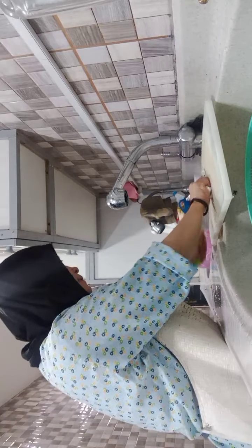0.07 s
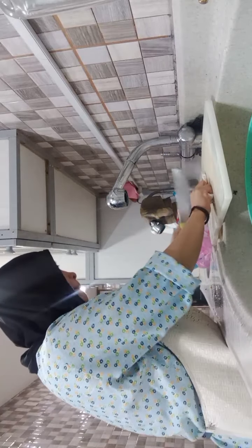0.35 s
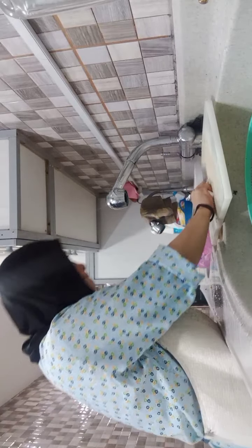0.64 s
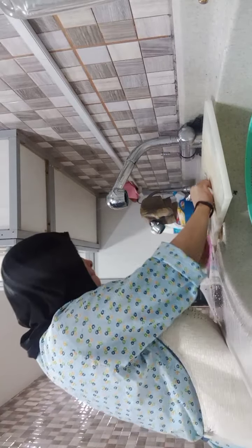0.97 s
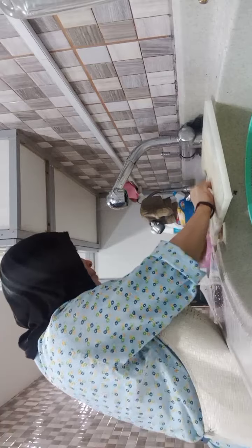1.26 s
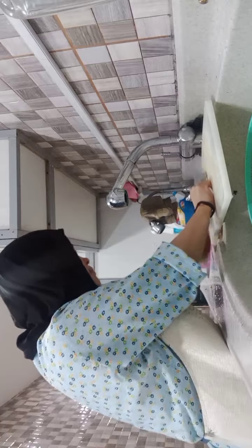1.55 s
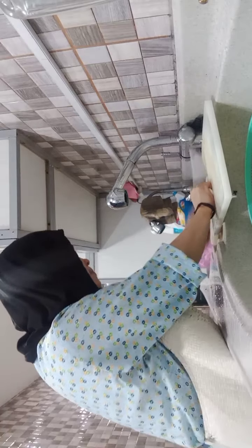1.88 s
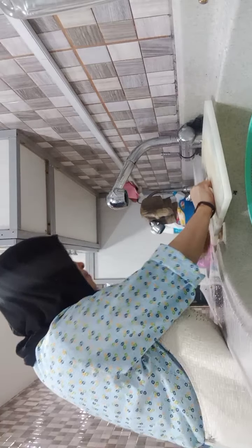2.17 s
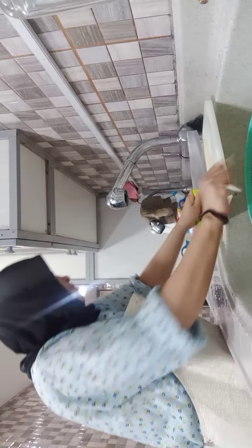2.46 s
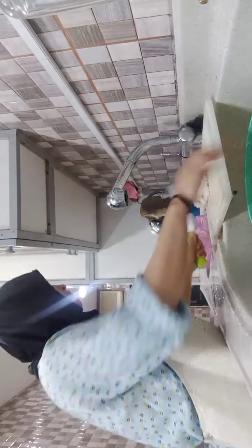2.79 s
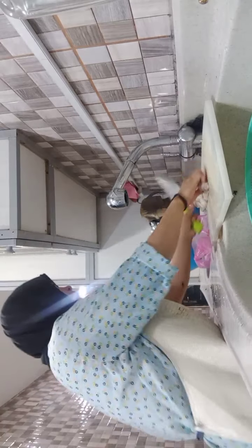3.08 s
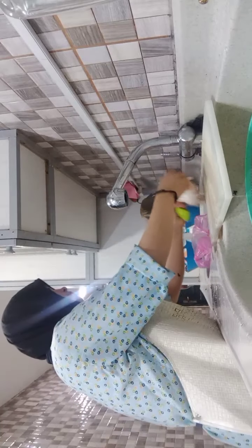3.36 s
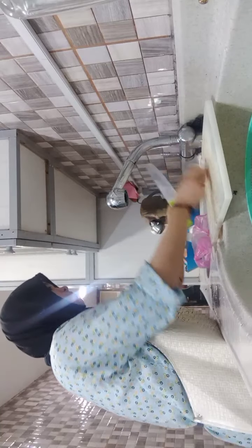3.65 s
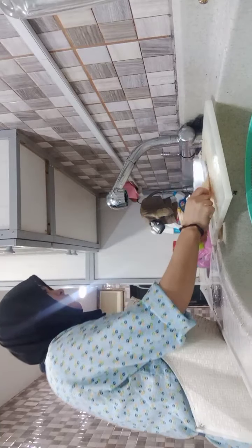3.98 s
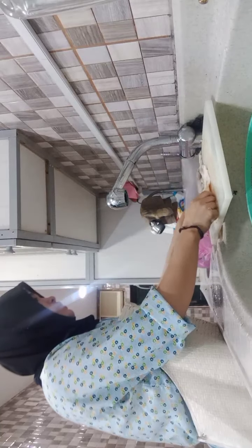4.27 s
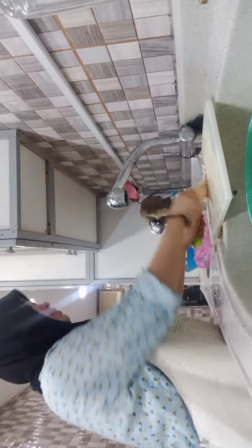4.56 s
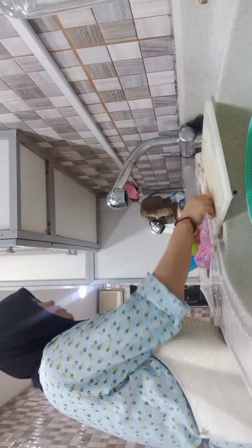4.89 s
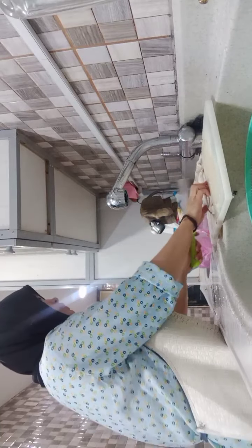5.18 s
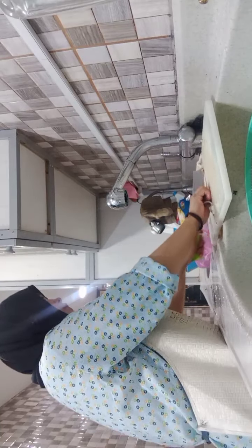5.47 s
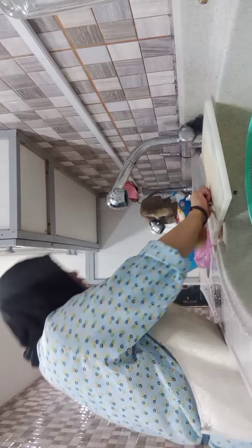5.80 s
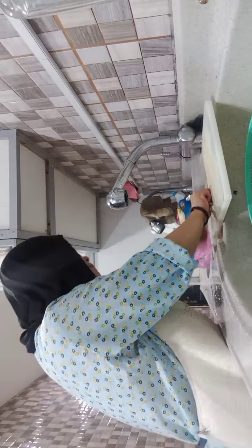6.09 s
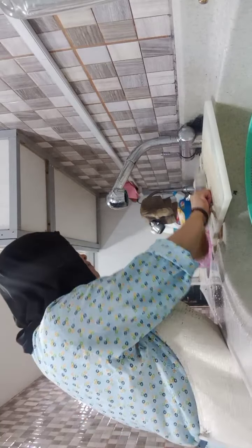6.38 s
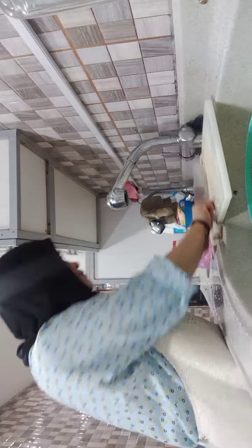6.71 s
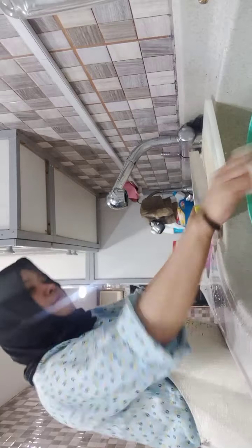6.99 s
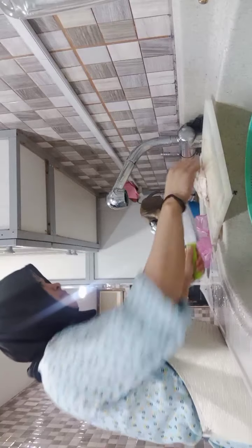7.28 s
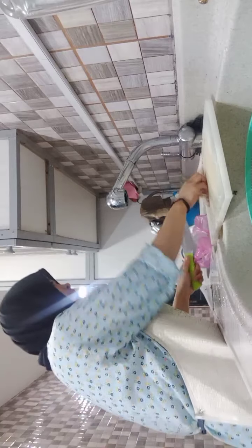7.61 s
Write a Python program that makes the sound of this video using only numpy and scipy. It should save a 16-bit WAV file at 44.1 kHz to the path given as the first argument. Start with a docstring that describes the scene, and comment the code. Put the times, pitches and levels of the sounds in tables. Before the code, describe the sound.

A wet sponge scrubs a cutting board over a sink in a small tiled kitchen. From about 0.5 to 2.3 seconds the strokes come quickly, with squelching suds, short judders of the board, dull nudges against the basin and light ticks and scrapes of a knife. The work then goes quieter, with a small clink near 2.7 seconds. At 3.6 seconds the blade strikes the board sharply, followed by a spit of foam at 4 and a hollow bump of the basin at 4.4. Scrubbing picks up again from 5.7 to 6.8 seconds, and at 6.1 the knife is put down with a loud, briefly ringing clack. A few soft knocks and a clink follow just after 7 seconds. Faintly behind it all are a thin, high pulsing whistle, a motor drone that comes and goes, electrical hum, low house noise and steady hiss.

```python
"""A wet sponge scrubs a cutting board and a knife over the sink of a small tiled kitchen.
Its slips shake the board and the basin; suds squelch and spit, and the board judders and bumps.
The knife clinks, scrapes, strikes the board and is once put down with a loud clack.
Behind it are a thin pulsing whistle, a motor's drone, mains hum, low house noise and a steady hiss."""
import sys
import numpy as np
from scipy import signal
from scipy.fft import rfft, irfft, next_fast_len
from scipy.io import wavfile
from scipy.ndimage import map_coordinates

SR = 44100
rng = np.random.default_rng(int(sys.argv[2]) if len(sys.argv) > 2 else 0)


def store_wav(level_fs):
    """Save 16-bit WAV to argv[1]."""
    pcm = np.round(np.clip(np.atleast_2d(level_fs), -1, 1) * 32767)
    wavfile.write(sys.argv[1], SR, pcm.T.astype(np.int16))


N = 337365

# sponge strokes: t/s, length/s, rub level/dB, wet swish level/dB
SPONGE_STROKES = [(0.534, 0.07, -59, -57), (0.656, 0.076, -48.5, -60.5), (0.784, 0.11, -48, -66),
                  (0.922, 0.089, -45.5, -62), (1.123, 0.044, -46, -66), (1.225, 0.086, -39.5, -53),
                  (1.411, 0.08, -44, -60), (1.528, 0.11, -46, -71), (1.687, 0.08, -42.5, -59),
                  (1.828, 0.047, -40.5, -45.5), (1.98, 0.079, -40, -57.5), (2.142, 0.083, -41.5, -54.5),
                  (3.05, 0.19, -53, -70.5), (4.031, 0.08, -39.5, -44), (4.43, 0.044, -55.5, -53),
                  (5.285, 0.11, -53, -73), (5.756, 0.06, -45, -57.5), (5.875, 0.075, -45.5, -62),
                  (6.053, 0.083, -43, -51.5), (6.355, 0.055, -40, -51.5), (6.549, 0.051, -43, -61),
                  (6.66, 0.12, -47.5, -62.5), (7.118, 0.015, -50, -45)]
# the hand's weight on the board, between strokes too: t/s, level/dB
HAND_PRESSURE = [(0, -47), (0.45, -58), (0.7, -50.5), (1.08, -59), (1.4, -46), (2.25, -53), (2.5, -56.5),
                 (3.15, -55), (3.38, -61), (3.8, -53.5), (4.7, -51.5), (5.55, -56.5), (5.9, -47),
                 (6.5, -46), (7.0, -55.5), (7.65, -52)]
# dull nudges of the board against the basin: t/s, length/s, level/dB
BOARD_NUDGES = [(0.0, 0.15, -45.5), (0.37, 0.094, -45), (0.72, 0.164, -43.5), (1.46, 0.11, -43.5),
                (1.7, 0.098, -44.5), (2.25, .11, -43), (2.44, .05, -48.5), (2.82, 0.081, -45),
                (3.56, 0.18, -46.5), (3.74, 0.048, -38), (5.44, 0.047, -43), (7.11, 0.037, -42.5),
                (7.2, 0.046, -44), (7.305, 0.03, -44)]
# body of the rubbed board: f/Hz, width/Hz, level/dB
BOARD_MODES = [(389, 95, -5.5), (553, 117, -0.5), (612, 91, 3), (818, 114, -2.5), (1052, 110, -14),
               (1315, 130, -9.5)]
# dark colour of the basin's rumble: f/Hz, level/dB
BASIN_EQ = [(40, -25), (70, -45), (100, -6), (140, 0.5), (230, 6.5), (330, 2.5), (450, -7.5), (700, -81.5)]
# bright colour of the suds: f/Hz, level/dB
SUDS_EQ = [(700, -5.5), (1300, 13.5), (1700, 0), (2400, 6), (4200, 6), (6000, 8.5), (8000, 12), (9300, -22),
           (11500, -46), (13500, -5), (15800, -29)]
def scrubbing():
    """Sponge slips shake basin and board and burst suds; the moving hand shifts the resonances."""
    start, length, rub_db, wet_db = np.transpose(SPONGE_STROKES)
    pressure = amp(curve(HAND_PRESSURE))
    force = pushes(zip(start, length, rub_db))
    wetness = pushes(zip(start, length, wet_db))

    def board(f):
        return sum((-1) ** k * amp(db) * 1j * f * width / (hz * hz - f * f + 1j * f * width)
                   for k, (hz, width, db) in enumerate(BOARD_MODES))

    rumble = coloured(slips(per_s=3000, scatter_db=2.5), BASIN_EQ)
    rumble = patchy(rumble, depth_db=7.5, width_hz=62.8, life_s=0.09, size=2048)
    rub = filtered(slips(per_s=2500, scatter_db=1), board)
    rub = coloured(rub, [(150, 10), (400, 6), (1400, -5.5), (3000, -30), (8000, -46.5)])
    rub = patchy(rub, depth_db=5.5, width_hz=80, life_s=0.06, size=2048)
    swish = coloured(slips(per_s=3600, scatter_db=-2.5), SUDS_EQ)
    swish = patchy(swish, depth_db=10.5, width_hz=280, life_s=0.055, size=512)
    pops = kitchen(coloured(slips(per_s=130, scatter_db=2), SUDS_EQ), wet_db=0)  # larger bubbles
    suds = unit(swish + unit(bubbles(count=600)) + 0.7 * unit(pops))
    shaking = np.hypot(amp(-6.5) * force, pushes(BOARD_NUDGES, release_s=0.019))
    # each layer's accents ride on a bed that follows the hand's pressure
    return (np.hypot(shaking, amp(1.5) * pressure) * rumble
            + np.hypot(force, amp(-3) * pressure) * rub
            + np.hypot(wetness, amp(-21) * pressure) * suds)


def pushes(rows, attack_s=0.012, release_s=0.054):
    """Envelope of the hand's pushes (t/s, length/s, level/dB): attack, hold, release."""
    power, t = np.zeros(N), np.arange(SR) / SR
    for s, length, db in rows:
        attack = 1 - np.exp(-(t / attack_s) ** 2)
        release = np.exp(-np.maximum(t - length, 0) / release_s)
        add(power, s - attack_s / 2, (amp(db) * attack * release) ** 2)
    return np.sqrt(power)


def bubbles(count):
    """Suds burst at random moments; each rings for some cycles at its own pitch."""
    track, t = np.zeros(N), np.arange(SR // 20) / SR
    for when, height, strength in rng.random((count, 3)):
        hz = 1300 * 6 ** height
        ping = np.sin(2 * np.pi * hz * t) * np.exp(-t * hz / 14)
        add(track, when * N / SR, amp(12 * strength) * ping)
    return kitchen(track, wet_db=6)


CHATTER_PER_S = 220  # wet surfaces catch and slip
# spurts of fine spray from the sponge: t/s, level/dB, rise/s
SPURTS = [(0.527, -48.5, 0.012), (0.684, -53.5, 0.014), (0.965, -57, 0.032), (1.232, -49, 0.016),
          (1.265, -56.5, 0.018), (1.53, -54, 0.04), (2.16, -55.5, 0.043), (2.672, -54.5, 0.017),
          (3.02, -63, 0.02), (3.64, -48, 0.035), (3.945, -50, 0.004), (3.99, -48, 0.025),
          (4.025, -41.5, 0.04), (4.347, -59, .004), (4.45, -56.5, 0.034), (5.32, -54, 0.055),
          (6.728, -58, 0.041), (7.105, -58, 0.026)]
def spray():
    """Squeezed foam spits tiny, very high crackles in quick spurts that trail off."""
    t = np.arange(N) / SR
    swell = lambda u: (u * np.exp(1 - u)) ** 2
    squeeze = sum(amp(db) * swell(np.maximum(t - s, 0) / rise) for s, db, rise in SPURTS)
    sizzle_eq = [(3000, -14), (5500, -2.5), (8300, -1), (9600, -25),
                 (11500, -16.5), (13500, -6), (15800, -1)]
    crackle = coloured(slips(per_s=9000, scatter_db=2), sizzle_eq)
    crackle = patchy(crackle, depth_db=7, width_hz=280, life_s=0.03, size=256)
    chatter = amp(1.5 * wobble(CHATTER_PER_S))
    return kitchen(squeeze * crackle * chatter, wet_db=-8)


# the board judders under the hand: centre t/s, level/dB, half width/s
BOARD_JUDDERS = [(0.661, -40.5, 0.015), (0.829, -40.5, 0.024), (0.972, -41, 0.019), (1.122, -34, 0.009),
                 (1.251, -31.5, 0.016), (1.572, -37.5, 0.047), (1.747, -40, 0.0097), (2.014, -34, 0.016),
                 (2.148, -36.5, 0.015), (4.043, -36, 0.015), (5.764, -33, 0.013), (5.785, -33.5, 0.009),
                 (5.802, -28.5, 0.0058), (5.846, -36, 0.0046), (6.072, -33.5, 0.025), (6.409, -35.5, 0.045),
                 (6.558, -39, 0.015)]
def judders(pitch_hz=632):
    """Stick and slip locks briefly and unevenly near the board's strongest resonance."""
    t = np.arange(N) / SR
    grip = sum(amp(db) * np.exp(-((t - s) / width) ** 2) for s, db, width in BOARD_JUDDERS)
    phase = 2 * np.pi * np.cumsum(pitch_hz * (1 + 0.03 * wobble(120))) / SR
    flutter = amp(1.5 * wobble(180))
    return grip * flutter * np.sin(phase)


# soft bumps on the basin: t/s, level/dB
BASIN_BUMPS = [(0.086, -40), (0.135, -40), (0.752, -39), (0.836, -40.5), (2.867, -46), (2.902, -42),
               (2.934, -46), (3.954, -35.5), (3.973, -39.5), (4.353, -27), (4.361, -25), (4.385, -28),
               (7.213, -40)]
# the basin's hollow ring: f/Hz, level/dB, t60/s
BASIN_MODES = [(195.4, -5.5, 0.34), (211.5, 9, 0.062), (241, -8, 0.28), (314, 7, 0.049),
               (325.3, -14.5, 0.3), (401, -10.5, 0.15), (581, -6, 0.039)]
def bumps():
    """Padded blows wake only the low modes of the basin."""
    track, t = np.zeros(N), np.arange(SR * 3 // 4) / SR
    for s, db in BASIN_BUMPS:
        thud = ringing(BASIN_MODES, t, scatter_db=1) * (1 - np.exp(-t / 0.003))
        add(track, s, amp(db) * kitchen(thud, wet_db=-10))
    return low_cut(track, hz=140)


# knife hits on the board: t/s, level/dB, snap against the crack/dB
KNIFE_HITS = [(3.636, -26, 0), (3.648, -25, -14)]
# colour of their crack: f/Hz, level/dB
CHOP_EQ = [(150, -18), (630, 6), (1240, 6), (1850, 4.5), (2400, -1), (3100, -7.5), (4000, 2.5), (5800, -8),
           (7600, -9.5), (9500, -30), (12000, -20), (15300, -28)]
# ring of the struck board: f/Hz, level/dB, t60/s
STRUCK_BOARD_MODES = [(953, 2, .25), (1157, 1, .25), (1534, -1, .16), (1790, 1, .2), (1981, 1, .16),
                      (3967, -3, .55)]
def chops():
    """The blade meets the board: a crack with a bright snap, then the board's short ring."""
    track, t = np.zeros(N), np.arange(SR) / SR
    for s, db, snap_db in KNIFE_HITS:
        crack = burst(CHOP_EQ, t60=0.038) + amp(snap_db) * steel_snap(t60=0.0084)
        ring = amp(-22) * ringing(STRUCK_BOARD_MODES, t, scatter_db=-3.5)
        add(track, s, amp(db) * kitchen(crack + ring, wet_db=-2.5))
    return track


# the knife lands and chatters: t/s after first touch, level/dB, likeness to a shared crack/0-1
KNIFE_BOUNCES = [(0, 0, .8), (.002, -1, .8), (.0088, -7, .3), (.0417, -16, 0)]
# colour of each contact: f/Hz, level/dB
CLACK_EQ = [(40, -20), (110, -18), (230, 1.5), (560, 4), (850, -4.5), (1300, 2.5), (1680, -11), (2000, 10),
            (2600, -6.5), (4450, 0.5), (4950, -6.5), (5550, 0.5), (6500, -8), (8100, -10.5), (9500, -20.5),
            (13500, -16.5)]
# ring of knife and sink: f/Hz, level/dB, t60/s
KNIFE_SINK_MODES = [(238, 5, .5), (266, 2, .55), (322, -2, .45), (495, 5, .1), (590, -2, .25),
                    (1055, -4, .38), (1324, -4, .38), (1443, -9, .45), (1930, -3, .18), (2072, -6, .4),
                    (2482, -12, .35), (3032, -9, .2), (3526, -15, .4), (3994, -14, .55), (4334, -10, .42),
                    (4540, -10, .48), (4640, -12, .42), (5017, -15, .38), (5527, -11, .3), (5975, -17, .5)]
def clack(at_s=6.099, crack_t60=0.023):
    """The knife lands hard: near-alike contacts comb-filter the crack; knife and sink ring on."""
    contacts, track, t = np.zeros(SR), np.zeros(N), np.arange(SR) / SR
    shared = burst(CLACK_EQ, crack_t60)
    for after, db, alike in KNIFE_BOUNCES:
        fresh = burst(CLACK_EQ, crack_t60)
        add(contacts, after, amp(db) * (alike * shared + np.sqrt(1 - alike ** 2) * fresh))
    contacts += amp(-3.5) * steel_snap(t60=0.012)
    # the blade comes to rest at once and damps most of the ring
    ring = ringing(KNIFE_SINK_MODES, t, scatter_db=1) * (1 + 2.5 * np.exp(-t / 0.011))
    add(track, at_s, amp(-14.5) * kitchen(contacts, wet_db=1.7))
    add(track, at_s, amp(-33.5) * kitchen(ring, wet_db=-4))
    return low_cut(track, hz=140)  # the clack carries no deep bass


def steel_snap(t60):
    """The very bright snap of steel at first touch."""
    return burst([(3000, -31), (7500, 5), (10500, -20.5), (14000, 10), (16000, 1)], t60)


# wet ticks, crunches and clinks: t/s, level/dB, f/Hz, half width/octaves, t60/s
WET_TICKS = [(0.689, -46, 6350, 0.98, 0.027), (1.394, -45, 6250, 0.18, 0.016),
             (1.543, -45.5, 8550, 0.21, 0.074), (1.736, -50, 1315, 0.028, 0.36),
             (1.837, -27.5, 5800, 0.13, 0.0074), (1.901, -37.5, 3800, 0.11, 0.066),
             (2.674, -43, 1900, 0.11, 0.032), (2.676, -45, 3130, 0.14, 0.064),
             (2.678, -46, 7480, 0.072, 0.11), (3.027, -60, 5560, 0.23, 0.05),
             (3.63, -37.5, 3650, 0.36, 0.051), (3.943, -44.5, 7100, 0.13, 0.012),
             (4.033, -31.5, 4560, 0.68, 0.019), (4.398, -46.5, 1970, 0.086, 0.071),
             (4.423, -37, 5800, 0.08, 0.024), (4.593, -46.5, 2760, 0.14, 0.053),
             (6.683, -50.5, 6500, 0.14, 0.086), (6.741, -42, 6000, 0.096, 0.015),
             (7.126, -42, 3080, 0.23, 0.083)]
def ticks():
    """Squeezed suds and light touches of the blade: short noise bursts around one pitch each."""
    track, t = np.zeros(N), np.arange(SR // 2) / SR
    for s, db, hz, spread, t60 in WET_TICKS:
        noise = rng.standard_normal(len(t))
        band = filtered(noise, lambda f: 1 / (1 + (np.log2((f + 1) / hz) / spread) ** 2))
        band = patchy(band, depth_db=6, width_hz=220, life_s=1, size=512)
        decay = amp(-60 * t / t60)
        tick = unit(band * decay) * np.sqrt(np.mean(decay ** 2))
        add(track, s, amp(db) * kitchen(tick, wet_db=-5.5))
    return filtered(track, lambda hz: amp(-10 * np.exp(-((hz - 10500) / 1800) ** 2)))  # treble scoop


# blade slides over the board: t/s, fade/s, level/dB, start f/Hz, end f/Hz
BLADE_SLIDES = [(1.001, 0.044, -56.5, 2650, 2340), (1.292, 0.038, -55.5, 2450, 2620),
                (1.538, 0.044, -50.5, 2550, 2350), (1.815, .035, -51.5, 3950, 4400),
                (2.018, 0.037, -56, 3500, 3080), (2.172, 0.0554, -50, 2550, 2800),
                (4.001, .07, -50.5, 5190, 3970), (4.4, 0.057, -49.5, 4500, 4080),
                (5.296, 0.082, -57.5, 4100, 4940)]
def scrapes():
    """The blade catches and slides: grit in one resonance that moves with the point of contact."""
    track, t = np.zeros(N), np.arange(SR // 2) / SR

    def grit(half_width_hz):
        return unit(filtered(rng.laplace(size=len(t)), lambda f: 1 / (1 + (f / half_width_hz) ** 2)))

    for s, fade, db, from_hz, to_hz in BLADE_SLIDES:
        phase = 2 * np.pi * np.cumsum(np.interp(t, [0, fade], [from_hz, to_hz])) / SR
        force = amp(db) * np.exp(-(t / fade) ** 2)
        width = 0.13 * from_hz
        add(track, s, force * (grit(width) * np.cos(phase) + grit(width) * np.sin(phase)))
    chatter = amp(3 * wobble(CHATTER_PER_S))
    return kitchen(track * chatter, wet_db=-6)


# the whistle swells and fades: t/s, level/dB
WHISTLE_FADER = [(0.2, -65), (1.0, -54.5), (1.8, -56), (2.2, -50.5), (2.7, -63.5), (3.5, -64), (3.95, -58),
                 (5.5, -60.5), (6.6, -52.5), (7.6, -63)]
def whistle(pitch_hz=2918, pulse_s=0.2955, first_weak_s=0.705, half_width_s=0.094):
    """A faint, slightly hoarse high tone that pulses in threes: one weak, two strong."""
    turns = (np.arange(N) / SR - first_weak_s) / pulse_s
    pulse = np.round(turns)
    weak = pulse % 3 == 0
    swell = amp(-17.5 * weak) * np.exp(-((turns - pulse) * pulse_s / half_width_s) ** 2)
    level = amp(curve(WHISTLE_FADER)) * (swell + amp(-19))  # a trace lingers between pulses
    phase = 2 * np.pi * np.cumsum(pitch_hz * (1 + 0.0012 * wobble(60))) / SR
    rasp = 0.33 * (wobble(130) * np.cos(phase) + wobble(130) * np.sin(phase))
    return level * (np.sin(phase) + rasp)


# the motor's load comes and goes: t/s, level/dB
MOTOR_FADER = [(0.35, -73), (0.65, -52), (1.05, -54.5), (1.75, -78), (2.35, -64.5), (3.45, -80),
               (3.95, -52), (4.4, -52.5), (5.15, -71.5), (6.15, -61.5), (6.95, -76), (7.65, -58)]
def motor():
    """A motor in the house takes up its load and rests again: a low tone in a noisy drone."""
    drone = coloured(rng.standard_normal(N), [(25, -13), (60, -4), (95, 9), (160, -4), (400, -55.5)])
    return amp(curve(MOTOR_FADER)) * (wavering_tone(59) + drone)


# mains overtones: f/Hz, level/dB
HUM_PARTIALS = [(118, -1), (237, -17)]
# slow drift of the hum: t/s, level/dB
HUM_FADER = [(0.25, -65), (0.5, -53), (0.9, -53), (1.2, -62), (3.3, -64), (5.3, -59), (5.7, -71),
             (6.3, -57.5), (7.65, -61)]
def mains_hum(throb_s=0.339, peak_at_s=0.52, depth_db=8.5):
    """Two mains overtones throb together while each flickers on its own."""
    t = np.arange(N) / SR
    throb_db = depth_db * np.cos(2 * np.pi * (t - peak_at_s) / throb_s)
    partials = sum(amp(db + 4.1 * wobble(15)) * wavering_tone(hz) for hz, db in HUM_PARTIALS)
    return amp(curve(HUM_FADER) + throb_db) * partials


# colour of the low room tone: f/Hz, level/dB
AIR_EQ = [(25, -38.5), (60, -36.5), (120, -2), (300, -8.5), (800, -0.5), (1150, -13.5), (2000, -24.5),
          (4300, -29), (6000, -50.5), (9000, -83.5)]
# colour of the hiss: f/Hz, level/dB
HISS_EQ = [(3000, -28), (5000, -33), (6000, -20), (6600, 1.5), (7800, -8.5), (9000, -34), (11500, -34.5),
           (15000, -26)]
# both sink now and then: t/s, level/dB
HOUSE_FADER = [(0, -3), (2.0, 2), (3.4, -5), (3.9, -1), (6.6, -1), (7.65, -3)]
def house_noise():
    """The low, churning noise of the house under a thin hiss."""
    air = coloured(rng.standard_normal(N), AIR_EQ)
    air = patchy(air, depth_db=8.5, width_hz=80.1, life_s=0.087, size=2048)
    hiss = coloured(rng.standard_normal(N), HISS_EQ)
    hiss = patchy(hiss, depth_db=4.5, width_hz=200, life_s=0.18, size=1024)
    return amp(curve(HOUSE_FADER)) * (amp(-54) * air + amp(-68.5) * hiss)


# reverb time of the tiled room: f/Hz, t60/s
TILE_DECAY = [(120, 0.37), (500, 0.92), (2000, 0.5), (5000, 0.64), (8000, 0.58), (10000, 0.38),
              (14000, 0.29)]
def kitchen(sound, wet_db):
    """A sound and the dense answer of the tiled walls."""
    hz, t, z = signal.stft(rng.standard_normal(min(len(sound), SR)), SR, nperseg=256)
    tail = signal.istft(z * amp(-60 * t / along(TILE_DECAY, hz)[:, None]), SR, nperseg=256)[1]
    tail *= 1 - np.exp(-np.arange(len(tail)) / SR / 0.0034)  # reflections take a moment to arrive
    return sound + amp(wet_db) * signal.fftconvolve(sound, tail / np.linalg.norm(tail))[:len(sound)]


def slips(per_s, scatter_db):
    """Tiny random impulses of uneven size."""
    impulses = (rng.random(N) < per_s / SR) * rng.standard_normal(N)
    return impulses * amp(scatter_db * rng.standard_normal(N))


def ringing(modes, t, scatter_db):
    """Damped modes, struck at new strengths each time."""
    return sum(rng.choice([-1, 1]) * amp(db + scatter_db * rng.standard_normal() - 60 * t / t60)
               * np.sin(2 * np.pi * hz * t) for hz, db, t60 in modes)


def burst(spectrum, t60):
    """One second holding a crack: dying noise forced to the given colour."""
    decay = amp(-60 * np.arange(2 * SR) / SR / t60)
    z = rfft(rng.standard_normal(2 * SR) * decay)
    crack = irfft(z / np.abs(z) * amp(along(spectrum, np.fft.rfftfreq(2 * SR, 1 / SR))))[:SR]
    return crack * np.linalg.norm(decay) / np.linalg.norm(crack)


def wavering_tone(hz):
    """A sine at rms 1 whose phase wanders slowly."""
    t = np.arange(N) / SR
    return np.sqrt(2) * np.sin(2 * np.pi * hz * t + 0.53 * wobble(4.5))


def wobble(per_s):
    """A smooth random curve with per_s knots a second."""
    return map_coordinates(rng.standard_normal(int(N * per_s / SR) + 4), [np.arange(N) * per_s / SR])


def patchy(x, depth_db, width_hz, life_s, size):
    """x at rms 1 with random resonant patches, width_hz wide, that last about life_s."""
    z = signal.stft(x, nperseg=size)[2]
    knots = np.indices(z.shape) * np.reshape([SR / size / width_hz, size / 2 / SR / life_s], (2, 1, 1))
    grid = rng.standard_normal(knots.max(axis=(1, 2)).astype(int) + 2)
    field = map_coordinates(grid, knots, order=1)
    return unit(signal.istft(z * amp(depth_db * field), nperseg=size)[1][:len(x)])


def filtered(x, response):
    """x through a frequency response."""
    size = next_fast_len(len(x) + 8192)
    return irfft(rfft(x, size) * response(np.fft.rfftfreq(size, 1 / SR)), size)[:len(x)]


def coloured(x, spectrum):
    """x shaped by (f/Hz, level/dB) points, at rms 1."""
    return unit(filtered(x, lambda hz: amp(along(spectrum, hz))))


def low_cut(x, hz):
    """x with the bass rolled off below hz."""
    return signal.sosfilt(signal.butter(2, hz, 'highpass', fs=SR, output='sos'), x)


def along(points, hz):
    """(f/Hz, value) points read on a log axis."""
    f, values = np.transpose(points)
    return np.interp(np.log(hz + 1), np.log(f + 1), values)


def curve(points):
    """(t/s, value) points as one value per sample."""
    return np.interp(np.arange(N) / SR, *np.transpose(points))


def amp(db):
    """Decibels to gain."""
    return 10 ** (np.asarray(db) / 20)


def unit(x):
    """x at rms 1."""
    return x / np.sqrt(np.mean(x ** 2) + 1e-20)


def add(track, s, sound):
    """Mix a sound into the track from time s."""
    part = track[max(round(s * SR), 0):][:len(sound)]
    part += sound[:len(part)]


def scene():
    """The work at the sink over the sounds of the house, in mono."""
    washing = scrubbing() + spray() + judders() + bumps()
    knife = chops() + clack() + ticks() + scrapes()
    background = whistle() + motor() + mains_hum() + house_noise()
    return (washing + knife + background)[None]


def record(dry):
    """A steep high cut takes off the very top."""
    top_hz, slope_hz = 15700, 300
    high_cut = lambda hz: np.clip((top_hz - hz) / slope_hz + 0.5, 0, 1)
    return np.array([filtered(channel, high_cut) for channel in dry])


dry = scene()
out = record(dry)
store_wav(out)
```